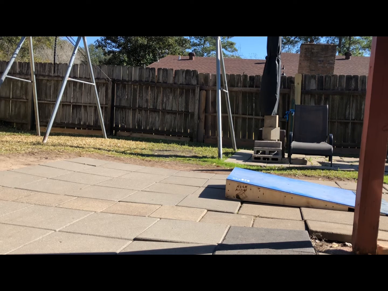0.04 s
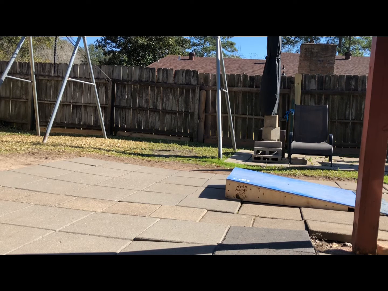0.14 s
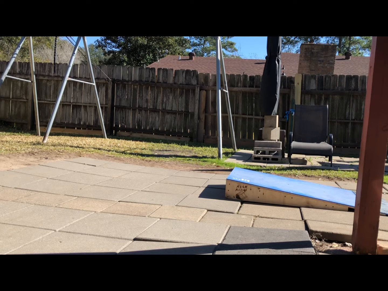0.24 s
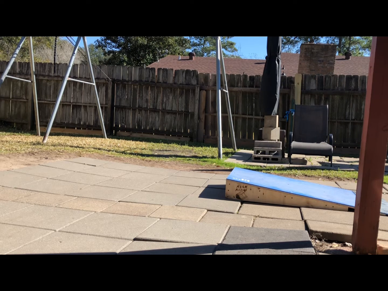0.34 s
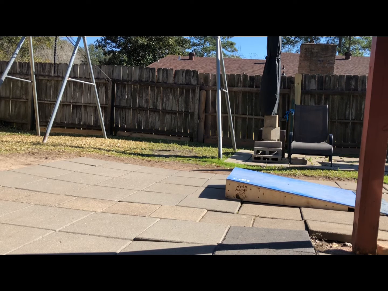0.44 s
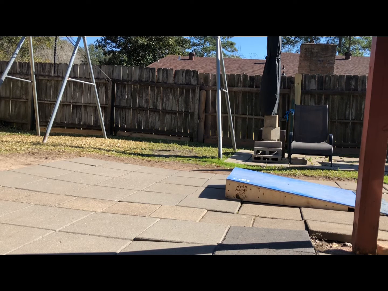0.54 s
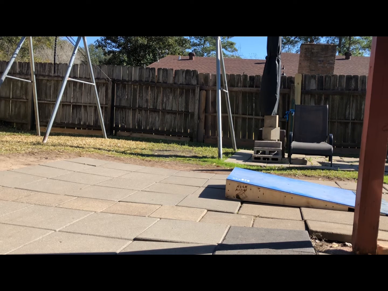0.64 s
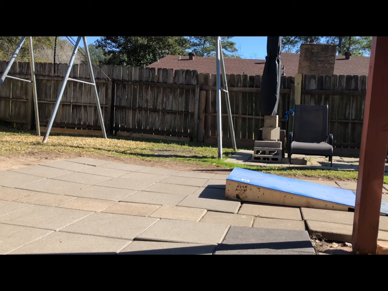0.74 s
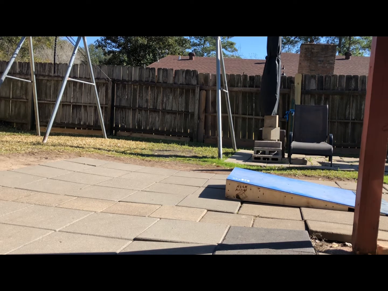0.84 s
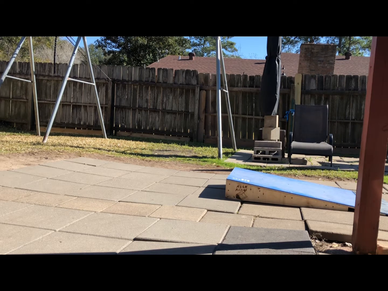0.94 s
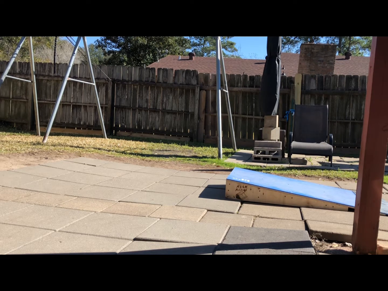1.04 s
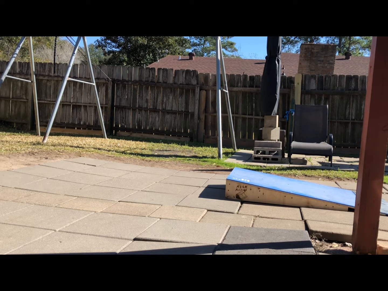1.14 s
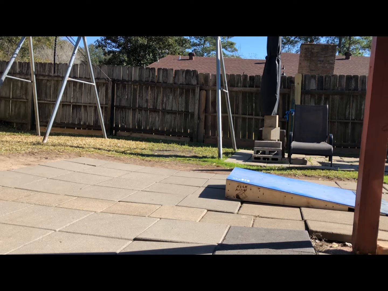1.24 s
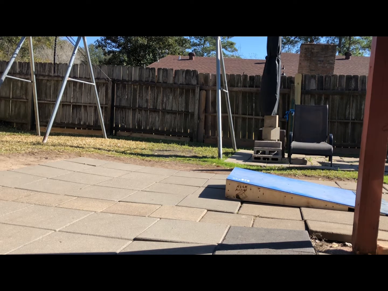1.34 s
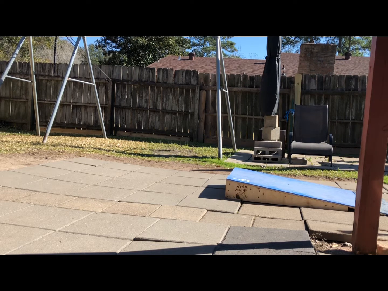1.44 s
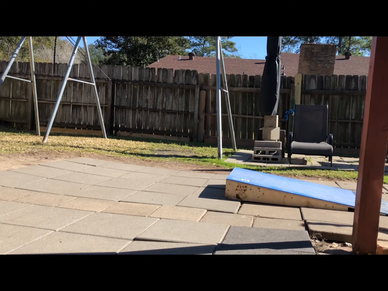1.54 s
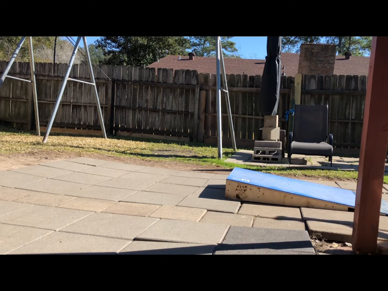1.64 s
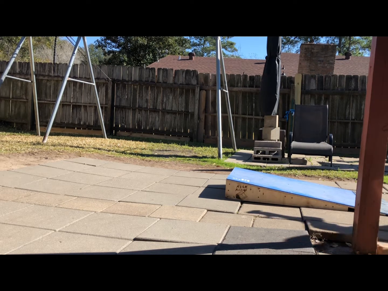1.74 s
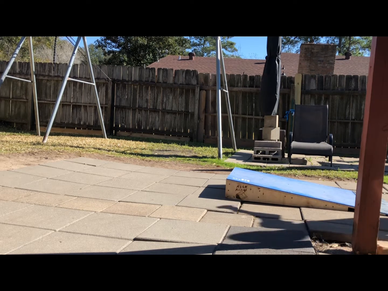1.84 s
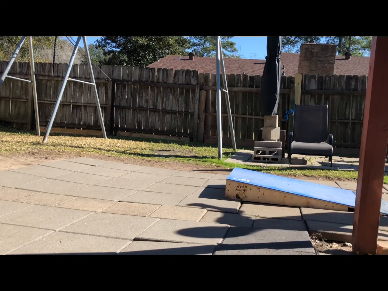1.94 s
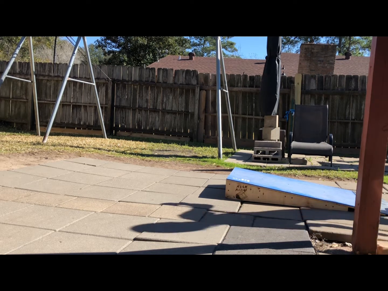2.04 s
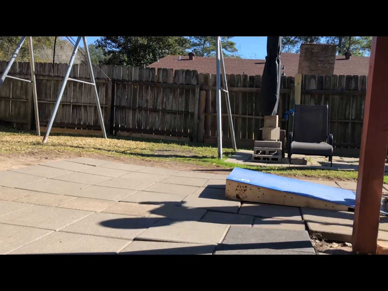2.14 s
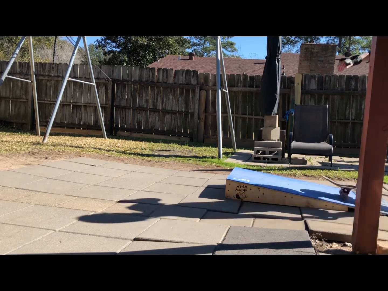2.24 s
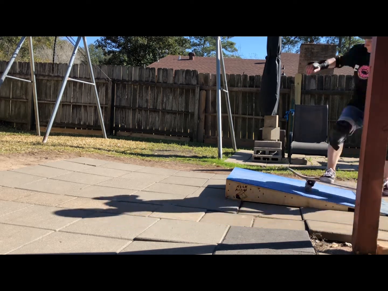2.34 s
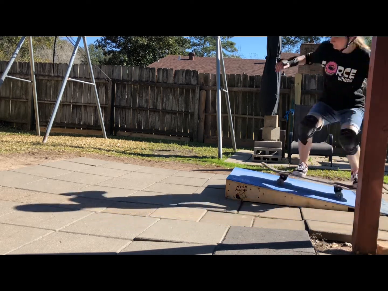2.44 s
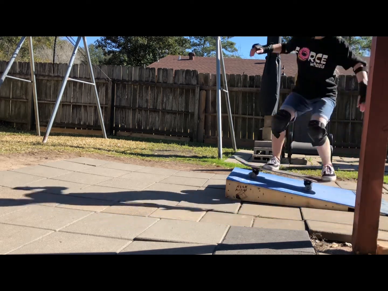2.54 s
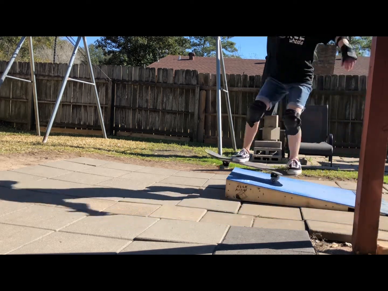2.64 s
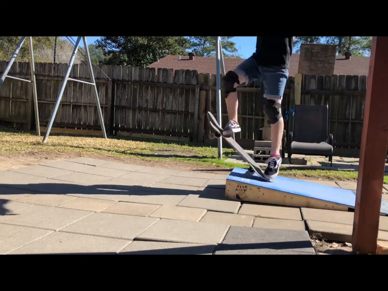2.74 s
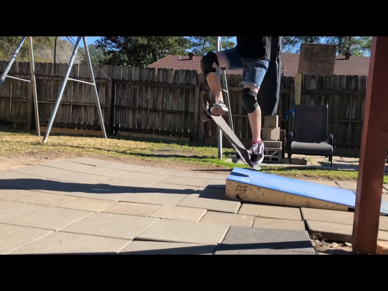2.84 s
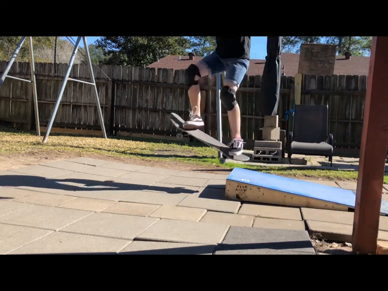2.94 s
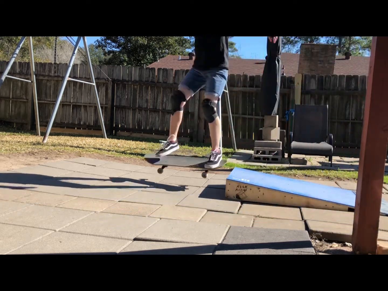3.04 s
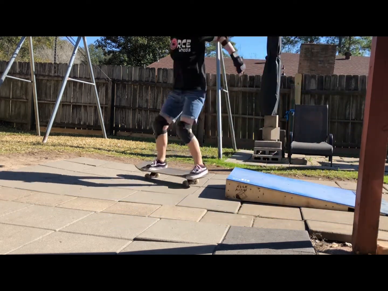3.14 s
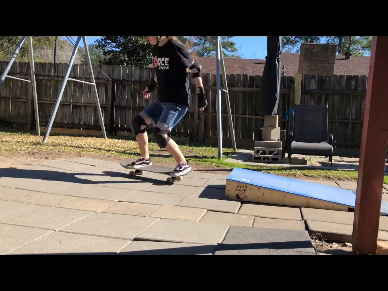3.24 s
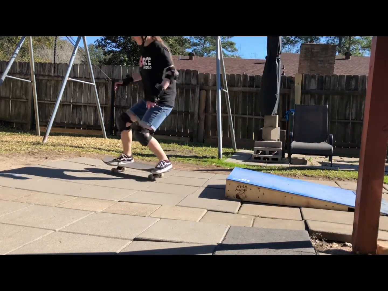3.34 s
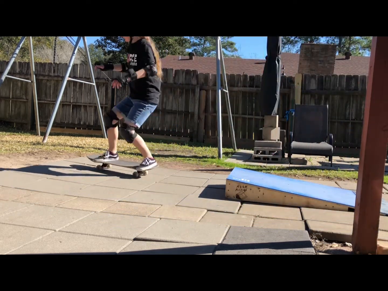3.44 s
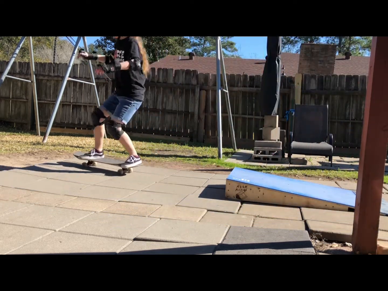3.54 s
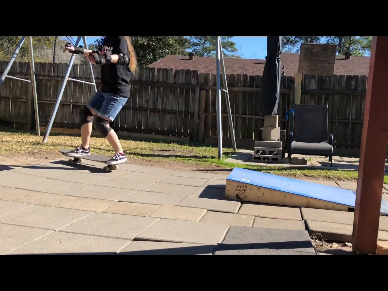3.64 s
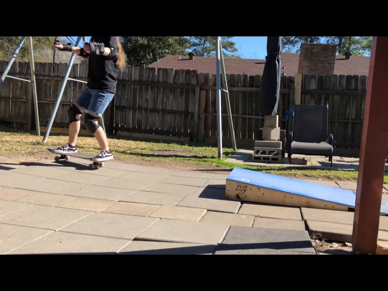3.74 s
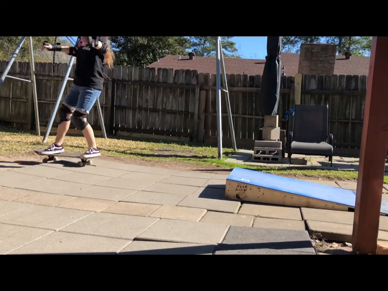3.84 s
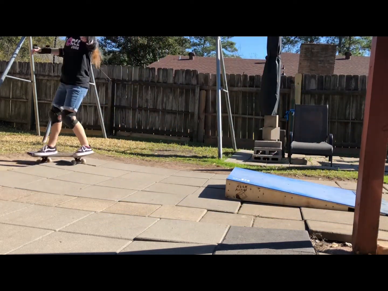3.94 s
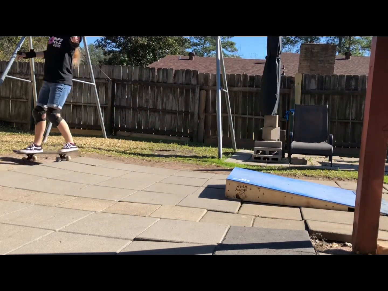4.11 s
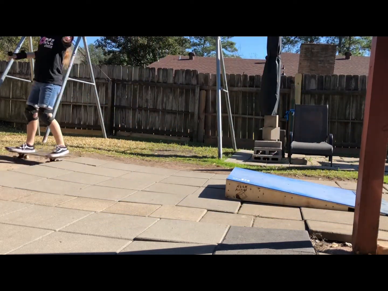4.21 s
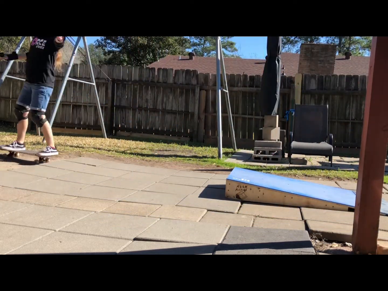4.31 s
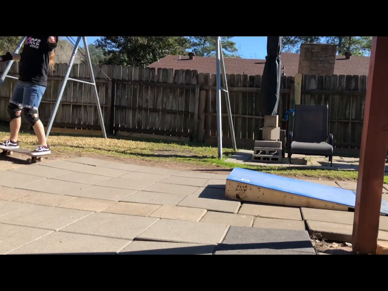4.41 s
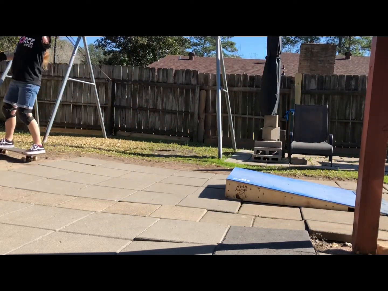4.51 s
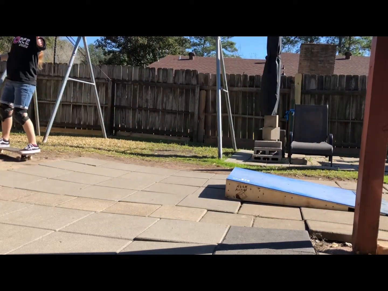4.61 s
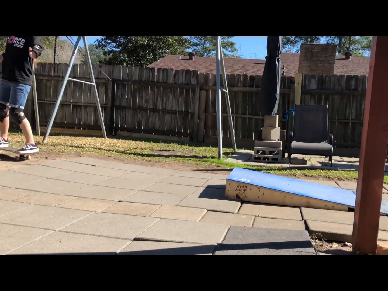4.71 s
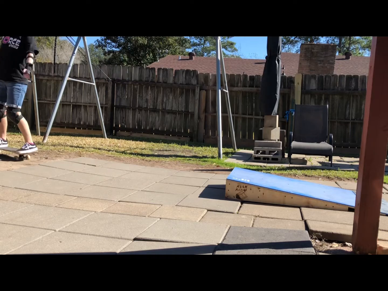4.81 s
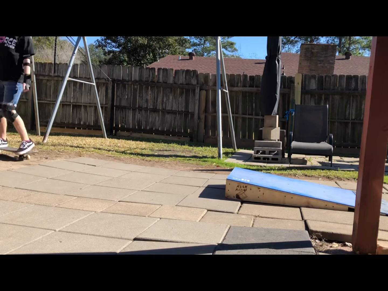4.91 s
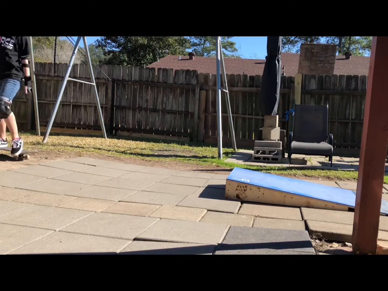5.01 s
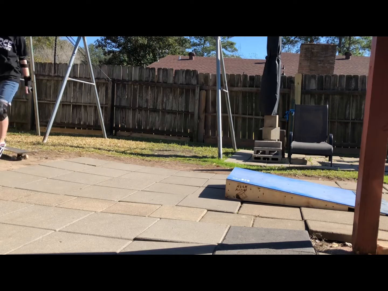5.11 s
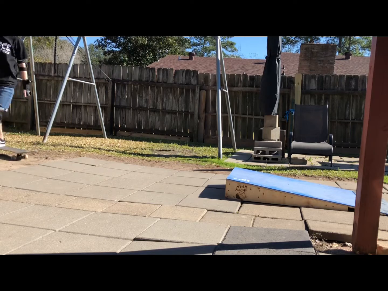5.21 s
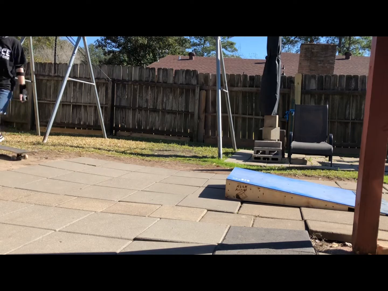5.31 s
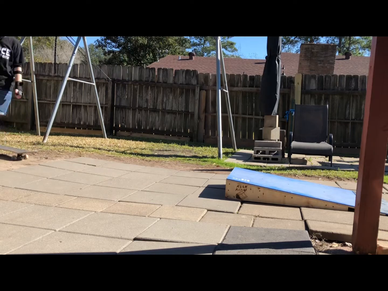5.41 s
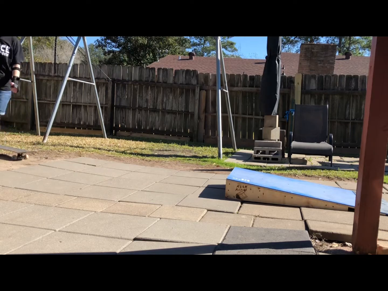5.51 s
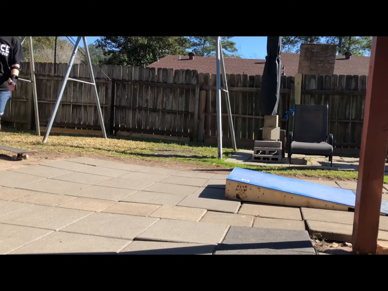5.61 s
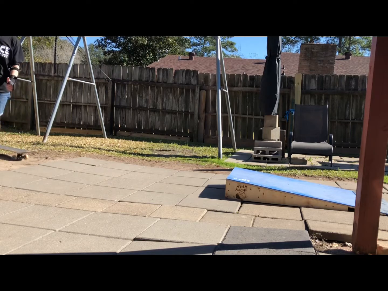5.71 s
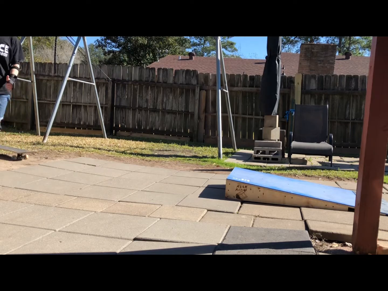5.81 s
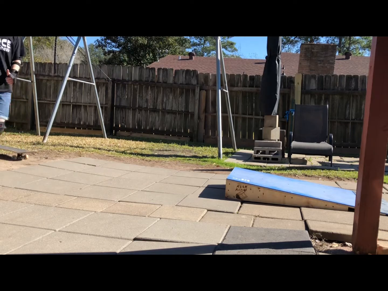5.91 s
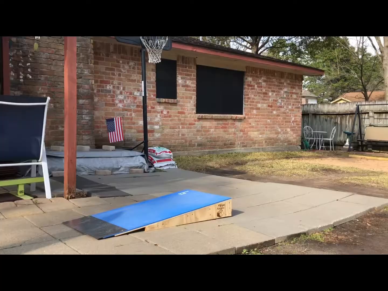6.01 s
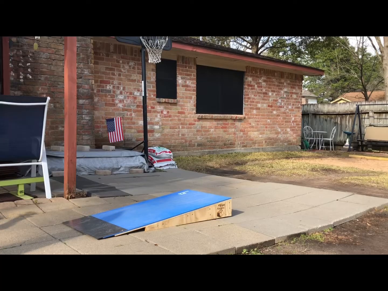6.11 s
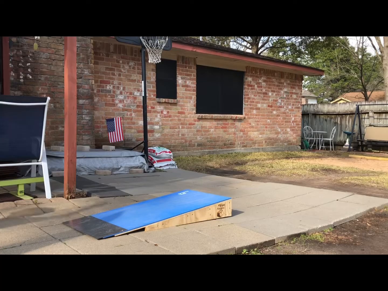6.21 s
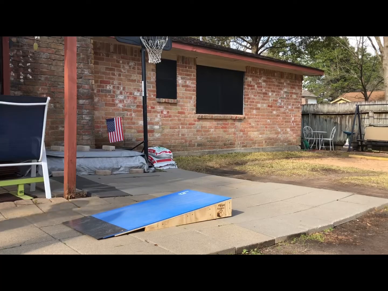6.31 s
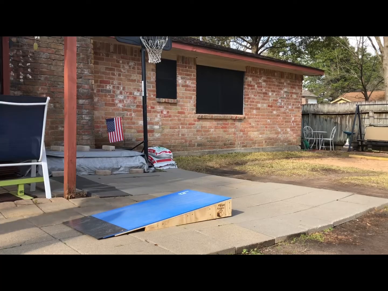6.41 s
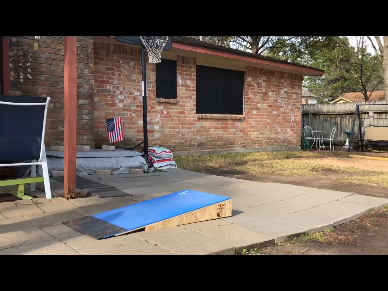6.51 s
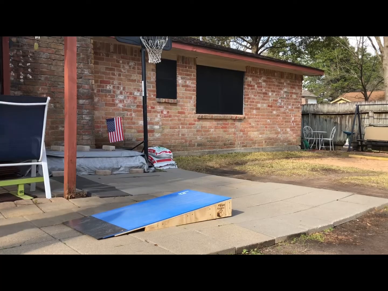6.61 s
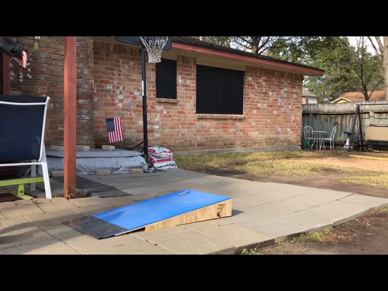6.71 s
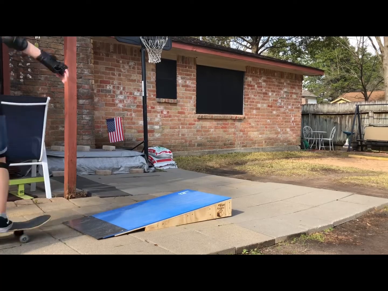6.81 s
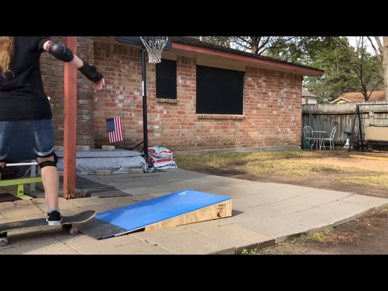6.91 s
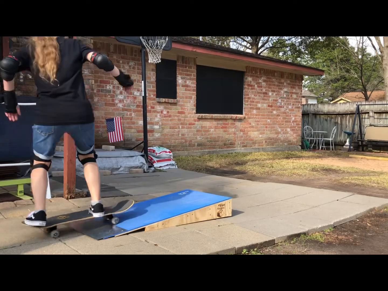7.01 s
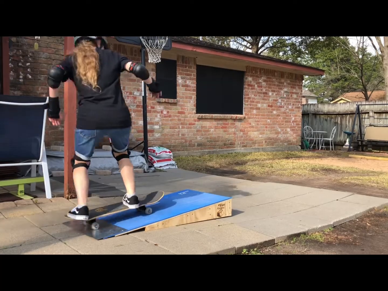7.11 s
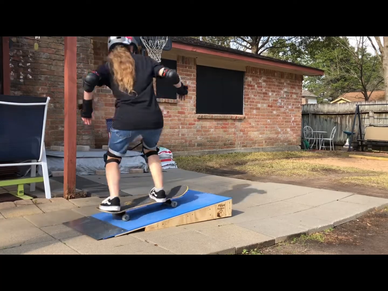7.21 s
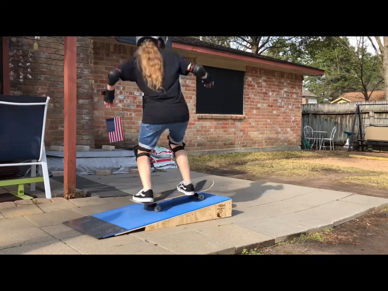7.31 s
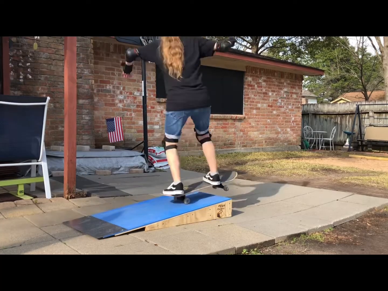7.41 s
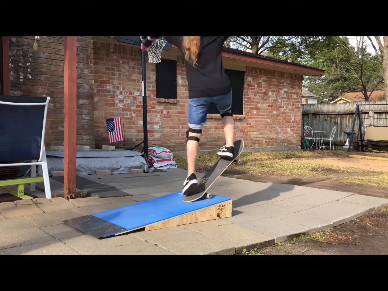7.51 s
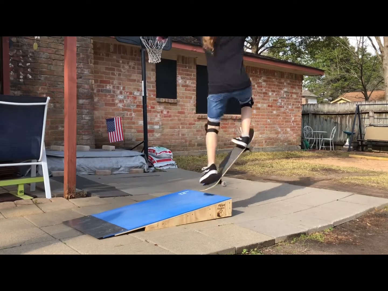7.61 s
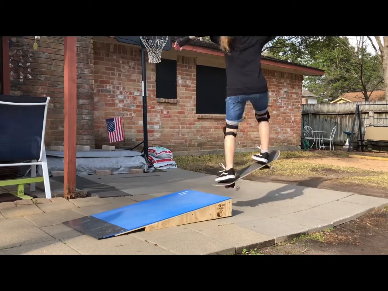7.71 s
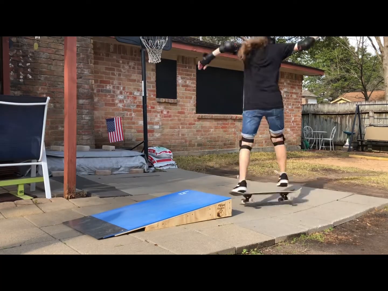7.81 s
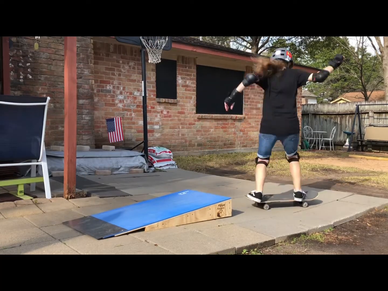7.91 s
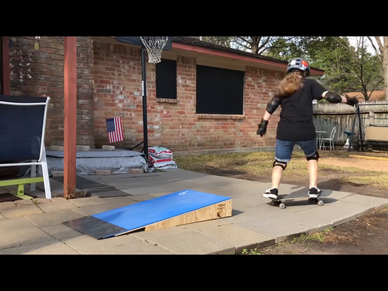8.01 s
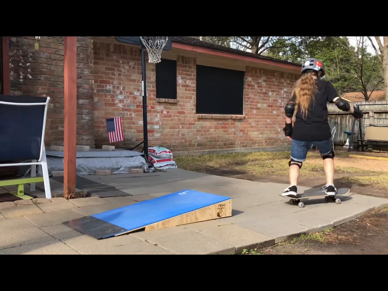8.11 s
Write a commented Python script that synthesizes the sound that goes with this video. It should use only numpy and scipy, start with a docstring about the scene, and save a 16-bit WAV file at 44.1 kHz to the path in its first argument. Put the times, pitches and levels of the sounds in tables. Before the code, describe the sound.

Quiet outdoor low rumble and thin hiss open, with a tiny rubber squeak at 0.25 s and a faint shoe scuff at 0.45. From 0.5 s skateboard wheels roll in, roar and paired knocks over paving joints growing strong by 1.3-2.0. At 2.1-2.4 they rasp onto a hollow plywood ramp, which booms and drums duller. A sharp tail pop cracks at 2.76; the roar drops to bearing hiss, then a cluster of hard landing clacks hits at 3.1. Rolling recedes with sparse knocks and sand ticks; a tail clack at 4.2, then near silence, a small squeak at 5.1 and scuffs at 5.7. At 5.95 a second run begins abruptly, close, with brisk knocks, ramp rasp and deep boom around 7.0, pop at 7.54, landing slaps at 7.85-7.9, and fading roll to 8.15. Short wall and fence echoes; phone sound with thin bass.

```python
"""A low outdoor rumble and a thin background hiss come first, then a rubber squeak and a shoe scuff.
A skateboard then makes two runs across a paved back yard, over a plywood kicker ramp, heard through a phone.
Filtered noise makes the roar; paired knocks and damped modes make the joints, the deck and the hollow ramp.
Noise bursts rasp up the ramp's entry plate; cracks over a ringing deck are the tail pops and landings.
Fence and house wall throw the clacks back as delayed slaps and a decaying noise tail."""
import sys
import numpy as np
from scipy import signal
from scipy.fft import rfft, irfft
from scipy.io import wavfile
from scipy.ndimage import uniform_filter1d

SR = 44100
rng = np.random.default_rng(int(sys.argv[2]) if len(sys.argv) > 2 else 0)


def to_wav(s):
    """Save 16-bit WAV."""
    ch = np.atleast_2d(s).T  # columns
    pcm = np.round(np.clip(ch, -1, 1) * 32767)  # PCM
    wavfile.write(sys.argv[1], SR, pcm.astype(np.int16))


N = 359415
TIME = np.arange(N) / SR  # s from the start
AGE = np.arange(SR // 3) / SR  # s since one hit


def undb(db):
    """Decibels to gain."""
    return 10 ** (np.asarray(db) / 20)


def unit(x):
    """Scale to rms 1."""
    return x / np.sqrt(np.mean(x ** 2))


def unit_hit(x):
    """Scale a hit to the energy of 5 ms at rms 1."""
    return x / np.sqrt(np.sum(x ** 2) / (.005 * SR))


def add(track, s, x):
    """Mix x into the track at time s."""
    i = int(s * SR)
    track[i:i + len(x)] += x[:N - i]


def colour(x, points):
    """Causal minimum-phase filter through (frequency [Hz], gain [dB]) points."""
    hz, db = np.transpose(points)
    size = 4096
    bin_hz = np.arange(size // 2 + 1) * SR / size
    gain_db = np.interp(np.log(bin_hz + 1), np.log(hz), db)
    # folding the cepstrum forward in time gives the minimum phase
    cepstrum = irfft(np.log(undb(gain_db)))
    cepstrum[1:size // 2] *= 2
    cepstrum[size // 2 + 1:] = 0
    impulse = irfft(np.exp(rfft(cepstrum)))
    return signal.fftconvolve(x, impulse)[:len(x)]


def grains(n, spread_db):
    """Dense micro-impacts of uneven size."""
    size_db = spread_db * np.minimum(rng.exponential(size=n), 5)
    return unit(rng.standard_normal(n) * undb(size_db))


def walk(rate):
    """Smooth random wander of rms 1, taking a new target rate times a second."""
    k = int(SR / rate)
    steps = np.repeat(rng.standard_normal(N // k + 1), k)
    return unit(uniform_filter1d(steps, k))[:N]


def narrow(hz, width_hz):
    """A ragged tone: a noise-driven resonance whose centre may move."""
    noise = rng.standard_normal((2, len(hz)))
    lowpass = signal.butter(2, width_hz / 2, fs=SR, output="sos")
    a, b = signal.sosfilt(lowpass, noise)
    phase = 2 * np.pi * np.cumsum(hz) / SR
    return unit(a * np.cos(phase) + b * np.sin(phase))


def rise(start, length):
    """From 0 to 1 in a straight line."""
    return np.clip((TIME - start) / length, 0, 1)


def fade(start, fall_s):
    """Hold at 1, then die away."""
    return np.exp(-np.maximum(TIME - start, 0) / fall_s)


def press(rise_s):
    """Contact force building up."""
    return 1 - np.exp(-(AGE / rise_s) ** 2)


def ring(modes, scatter_db, detune):
    """Decaying modes; every blow meets them in another place and under another load."""
    hz, db, t60 = np.transpose(modes)[:, :, None]
    size, pitch, phase = rng.standard_normal((3, len(modes), 1))
    waves = np.sin(2 * np.pi * (hz * (1 + detune * pitch) * AGE + phase))
    decay = np.exp(-np.log(1000) * AGE / t60)
    return np.sum(undb(db + scatter_db * size) * waves * decay, axis=0)


# distant low rumble outdoors: (frequency [Hz], level [dB])
AIR = [(25, -29.5), (50, -4.5), (90, -1), (125, -3.5), (175, -5.5), (260, -9.5), (400, -20), (600, -24),
       (1400, -31.5), (3000, -39), (4500, -38.5), (7500, -43.5), (10500, -42), (12000, -54.5),
       (16000, -57.5)]
# centre of the thin high background hiss: (time [s], frequency [Hz])
HISS = [(0, 9300), (2.5, 9420), (4.6, 9880), (8.15, 10100)]
AIR_DB = -54  # mean level of the rumble


def background():
    """Distant low rumble of wandering level, under a thin high background hiss of slowly moving pitch."""
    rumble = unit(colour(rng.standard_normal(N), AIR)) * undb(AIR_DB + 1.5 * walk(6.5))
    hiss_hz = np.interp(TIME, *np.transpose(HISS))
    return rumble + undb(-75.5) * narrow(hiss_hz, width_hz=750)


# rubber squeaking as the weight shifts:
# (time [s], level [dB], start frequency [Hz], end frequency [Hz], length [s])
SQUEAKS = [(0.255, -58.5, 1710, 1060, 0.026), (4.64, -63, 2425, 2170, 0.054),
           (5.133, -57, 2587, 1440, 0.026)]


def squeaks():
    """Rubber slips briefly, its pitch falling as the strain lets go."""
    out = np.zeros(N)
    for s, db, start_hz, end_hz, length in SQUEAKS:
        n = int(length * SR)
        tone = narrow(np.geomspace(start_hz, end_hz, n), width_hz=620)
        add(out, s, undb(db) * signal.windows.tukey(n, .5) * tone)
    return out


# single slaps back from fence and walls: (delay [s], level [dB])
WALLS = [(.013, -17), (.029, -17), (.043, -28.5), (.061, -29)]


def yard(x, t60_s, low_t60_s, tail_db, low_db):
    """A few wall slaps and the scatter from fence boards and trees; the lows stay longest."""
    tail_points = [(200, 3.5), (1400, -1.0), (2800, -4.5), (5000, -1.5), (9000, -2.5), (15000, -13.5)]
    low_points = [(100, -1.5), (300, 2.5), (900, -33.5), (3000, -57.5)]
    tail = colour(rng.standard_normal(len(AGE)), tail_points)
    tail = unit(tail * press(0.0043) * np.exp(-np.log(1000) * AGE / t60_s))
    low = colour(rng.standard_normal(len(AGE)), low_points)
    low = unit(low * press(0.035) * np.exp(-np.log(1000) * AGE / low_t60_s))
    echo = undb(tail_db) * tail + undb(low_db) * low
    echo /= np.sqrt(len(AGE))  # levels now hold for the energy of the whole echo
    for delay, db in WALLS:
        echo[int(delay * SR)] += undb(db)
    return signal.fftconvolve(x, echo)[:N]


def rubs(table, spectrum, spread_db, rise_s, fall_s):
    """Bursts of micro-impacts that last as long as the contact, then die away."""
    out = np.zeros(N)
    for s, db, length in table:
        shape = press(rise_s) * np.exp(-np.maximum(AGE - length, 0) / fall_s)
        add(out, s, undb(db) * shape * unit(colour(grains(len(AGE), spread_db), spectrum)))
    return out


# shoes scuffing: (time [s], level [dB], length [s])
SCUFFS = [(.445, -61.5, 0.029), (2.63, -49, 0.072), (4.225, -36, 0.0054), (5.135, -54, 0.011),
          (5.685, -48.5, 0.038), (5.710, -46, .014)]
# colour of a scuff: (frequency [Hz], level [dB])
SHOE = [(200, 3), (800, 1), (2500, -6), (4800, 1.5), (8000, -9.5), (15000, -13)]


def scuffs():
    """Shoe soles scuff, as short bursts of very uneven grains."""
    return rubs(SCUFFS, SHOE, spread_db=5.5, rise_s=0.0013, fall_s=0.011)


# each knock sets the wheels ringing, so that their hum swells and sinks back
KICK_DB, KICK_S = 7.5, 0.036  # hum gain for a kick of 1; decay time


def kicks():
    """Swells towards 1 just after each knock, falling back to 0."""
    return np.max([rise(s, .01) * fade(s, KICK_S) for s, *_ in KNOCKS], axis=0)


# loudness of the rolling, which grows with speed and nearness, one curve a run: (time [s], level [dB])
RUN_A = [(0.52, -47.5), (0.7, -48), (1.12, -42.5), (1.3, -36.5), (2.2, -35), (2.7, -39.5), (3.0, -45),
         (3.5, -44), (4.15, -57), (4.4, -65.5), (5.1, -74.5)]
RUN_B = [(5.96, -41), (6.03, -39), (6.25, -37), (6.8, -38), (7.0, -28), (7.5, -39.5), (8.0, -44),
         (8.15, -49)]
# the jump of each run: (onto the ramp [s], take-off [s], landing [s],
# panel note at the foot [Hz], at the lip [Hz], panel ring-out [s])
JUMP_A = (2, 2.76, 3.09, 160, 190, .04)
JUMP_B = (6.95, 7.53, 7.86, 165, 140, 0.13)
# wheel roar on paving in each run, and on plywood: (frequency [Hz], level [dB])
ROAR_A = [(100, -20), (220, 0), (380, 3), (560, -1), (760, -2.5), (1050, -7), (1700, -8.5), (2600, -28.5),
          (5000, -38.5)]
ROAR_B = [(100, -13), (220, -5), (420, -0.5), (620, -0.5), (760, -3), (950, -5), (2000, -11), (2800, -30),
          (5000, -31)]
ROAR_RAMP = [(100, -17.5), (250, 3), (400, 7.5), (650, 1.5), (1000, -5.5), (2000, -15), (3000, -28.5),
             (6000, -43)]
# colour of bearing hiss and of gritty crunches: (frequency [Hz], level [dB])
GRIT = [(300, -18), (1200, 6), (2500, 1), (4500, -1.5), (7000, -6.5), (10000, -8.5), (12500, -14.5),
        (16000, -10)]
# maple deck with its trucks, bending: (frequency [Hz], level [dB], t60 [s])
DECK_LOW = [(165, -9.5, 0.078), (246.6, -9.5, 0.13), (339, -5, .07), (423.5, -2, 0.06), (510, -1.5, 0.07),
            (589, -4.5, 0.084), (691, 5.5, 0.031), (798, -2, 0.034), (896, -3, 0.044)]
# both axles get onto the ramp; the roar dies after take-off; it returns after landing
AXLE_GAP_S, LIFT_S, SETTLE_S = 0.11, .06, 0.18
# bearing hiss: dB per dB of roar; change on plywood; change off the ground
HISS_SLOPE, SMOOTH_RAMP_DB, FREE_SPIN_DB = 0.44, -2, -0.5
RUMBLE_DB = -10  # deck rumble beside the roar


def rolling(run, jump, spectrum, hum_hz, hum_db, hiss_db, panel_db):
    """Paving shakes deck and wheels; plywood is duller and drums; off the ground the bearings hiss on."""
    s, db = np.transpose(run)
    enter, take_off, land, foot_hz, lip_hz, ring_out = jump
    roar_db = np.interp(TIME, s, db)
    moving = rise(s[0], 0.0021) * (1 - rise(s[-1], 0.14))
    contact = np.maximum(fade(take_off, LIFT_S), rise(land, SETTLE_S))
    on_ramp = rise(enter, AXLE_GAP_S) * (TIME < land)

    bumps = grains(N, spread_db=4.5)
    hum = undb(hum_db + KICK_DB * kicks()) * narrow(hum_hz * undb(.3 * walk(9)), width_hz=65)
    paving = unit(colour(bumps, spectrum)) + hum
    plywood = undb(0.5) * unit(colour(bumps, ROAR_RAMP))
    wheels = ((1 - on_ramp) * paving + on_ramp * plywood) * undb(2.1 * walk(45))

    # the two lowest deck modes, shaken by the same bumps
    deck = ring(DECK_LOW[:2], scatter_db=3.5, detune=0.0092)
    rumble = undb(RUMBLE_DB) * unit(signal.fftconvolve(bumps, deck)[:N])

    note_hz = foot_hz + (lip_hz - foot_hz) * rise(enter, take_off - enter)
    panel = undb(panel_db) * on_ramp * fade(take_off, ring_out) * narrow(note_hz, width_hz=40)

    bearings = unit(colour(grains(N, spread_db=5.0), GRIT)) * undb(1.4 * walk(63))
    bearings_db = hiss_db + HISS_SLOPE * roar_db
    bearings_db += SMOOTH_RAMP_DB * on_ramp * contact + FREE_SPIN_DB * (1 - contact)
    roar = undb(roar_db) * (contact * (wheels + rumble) + panel)
    return moving * (roar + undb(bearings_db) * bearings)


def bounce(hz, rise_s, fall_s, stiffen):
    """A urethane wheel bouncing on its truck; squeezed at first, it starts stiffer and higher."""
    phase = 2 * np.pi * np.cumsum(hz * (1 + stiffen * np.exp(-AGE / rise_s))) / SR
    return unit_hit(np.sin(phase) * press(rise_s) * np.exp(-AGE / fall_s))


# maple deck with its trucks, clacking: (frequency [Hz], level [dB], t60 [s])
DECK_HIGH = [(1030, 4.5, 0.045), (1124, 2.5, 0.038), (1196, 0, 0.066), (1330, 2, 0.026), (1505, 3.5, 0.045),
             (1681, -2.5, 0.023), (1884, -3.5, 0.032), (2095, -3.5, 0.093), (2290, -12.5, 0.02),
             (2581, -16, 0.032), (2850, -20, 0.02), (3215, -14, 0.014), (3450, -11, 0.067)]


def clatter(rise_s, fall_s):
    """The deck's upper modes, shaken by a short run of impacts and strongly damped."""
    modes = ring(DECK_HIGH, scatter_db=1.5, detune=.06) * np.exp(-AGE / .004)
    impacts = grains(len(AGE), spread_db=6) * press(rise_s) * np.exp(-AGE / fall_s)
    return unit_hit(signal.fftconvolve(impacts, modes)[:len(AGE)])


# a grittier knock also has a harder low thud
THUD_DB, THUD_HZ = -13.5, 102  # level beside the grit; pitch it settles to


def single_knock(hz, clack_db, grit_db):
    """One blow: grit crunches, the wheel bounces, a low thud sounds and the deck answers."""
    bend = ring(DECK_LOW, scatter_db=1.5, detune=0.055) * press(0.003) * np.exp(-AGE / 0.03)
    clack = clatter(rise_s=0.0031, fall_s=0.0066)
    crunch = grains(len(AGE), spread_db=3.5) * press(0.00052) * np.exp(-AGE / 0.0099)
    body = undb(-11.5) * bounce(hz, rise_s=0.0026, fall_s=0.0094, stiffen=0.16)
    body += undb(-10.5) * unit_hit(bend)
    body += undb(THUD_DB + grit_db) * bounce(THUD_HZ, rise_s=0.005, fall_s=0.018, stiffen=.1)
    return body + undb(clack_db) * clack + undb(grit_db) * unit_hit(colour(crunch, GRIT))


# paired knocks of wheels or board, on paving joints, on the ramp or at rest: (time [s], level [dB],
# knock frequency [Hz], deck clack [dB], grit [dB], lag of the second knock [s])
KNOCKS = [(0.526, -23, 557, -9, -16, .003), (0.584, -38.5, 524, -1, -10, 0.0026),
          (0.643, -24, 360, -7.5, -18.5, 0.0044), (0.753, -18.5, 354, -22, -36, 0.0028),
          (0.831, -22.5, 700, -18, -24.5, 0.015), (0.953, -14.5, 391, -11, -19, 0.003),
          (1.035, -22.5, 300, -11, -18.5, 0.0033), (1.166, -11, 549, -8.5, -20.5, .003),
          (1.233, -11, 970, -11, -29, 0.0033), (1.317, -5, 588, -15.5, -23.5, 0.0044),
          (1.502, -6.5, 562, -11, -23, 0.0049), (1.644, -1.5, 943, -13, -19, 0.0095),
          (1.809, -3.5, 588, -12.5, -18, 0.014), (1.961, -8, 508, -11.5, -14.5, 0.015),
          (2.106, -4.5, 545, -15, -13, 0.0061), (2.144, -11.5, 688, -24, -39, 0.0038),
          (2.223, -11, 408, -18.5, -16.5, 0.0037), (2.246, -9.5, 694, -11, -15.5, 0.0029),
          (2.282, -12.5, 640, -17, -24, 0.00403), (2.377, -11.5, 493, -20.5, -35, 0.00387),
          (3.31, -20.5, 793, -8.5, -9, 0.0019), (3.34, -25, 327, -15, -21, 0.0041),
          (3.539, -18.5, 610, -12.5, -11, 0.0019), (3.567, -24.5, 384, -12, -19, 0.0041),
          (3.79, -17.5, 382, -18.5, -21, 0.018), (3.901, -28, 660, -15, -13, 0.0031),
          (5.163, -30.5, 472, -24, -28, 0.00203), (5.956, -25, 653, -14.5, -20, 0.0021),
          (6.059, -12, 700, -13.5, -11, 0.015), (6.119, -22.5, 620, -12, -6.5, 0.0028),
          (6.189, -5.5, 695, -12, -12, 0.012), (6.353, -11, 918, -7.5, -12.5, 0.0063),
          (6.498, -6.5, 735, -7.5, -13.5, .006), (6.633, -4, 680, -13, -17, 0.011),
          (6.77, -5.5, 670, -18, -17.5, 0.0091), (6.903, -7.5, 770, -13, -15, 0.0036),
          (6.955, -10, 287, -12, -2, 0.0043), (7.041, -7.5, 389, -18, -12, 0.0051),
          (7.099, -5, 557, -16, -6.5, .011), (7.201, -11, 380, -21, -23.5, .004)]
# the second knock of a pair is lower and cleaner
SECOND_DB, SECOND_PITCH, SECOND_GRIT_DB = 0.5, 0.857, -10


def knocks():
    """Wheels or board knock in pairs, the second blow just after the first."""
    out = np.zeros(N)
    for s, db, hz, clack_db, grit_db, lag in KNOCKS:
        first = single_knock(hz, clack_db, grit_db)
        second = single_knock(hz * SECOND_PITCH, clack_db, grit_db + SECOND_GRIT_DB)
        add(out, s, undb(db) * first)
        add(out, s + lag, undb(db + SECOND_DB) * second)
    return out


# wheels rasping over the entry plate: (time [s], level [dB], length [s])
RASPS = [(2.143, -21, 0.0039), (2.280, -23.5, 0.0083), (6.952, -20.5, 0.013), (7.094, -18.5, 0.0075),
         (7.108, -27, 0.0044)]
# colour of the plate: (frequency [Hz], level [dB])
PLATE = [(300, 0), (1200, 4.5), (2500, -1), (5000, 2.5), (7500, 1), (10000, 1.5), (12500, -6.5),
         (16000, -11)]


def rasps():
    """Wheels rasp over the ramp's entry plate, as sharp bursts of grains."""
    return rubs(RASPS, PLATE, spread_db=-2, rise_s=0.00044, fall_s=0.007)


# booms of the hollow ramp, under the wheels and after the board has left: (time [s], level [dB])
BOOMS = [(2.146, -32), (2.234, -20.5), (2.270, -15), (2.386, -11), (6.970, -6.5), (7.043, -16),
         (7.109, -12), (7.580, -16.5), (7.678, -24.5)]
# plywood ramp: (frequency [Hz], level [dB], t60 [s])
RAMP = [(86.3, -21.5, 0.34), (120.5, -18.5, 0.95), (153.4, 3, 0.11), (198.4, -15, 0.35), (261, -7, 0.12),
        (297, -18.5, 0.043), (364.6, -9, 0.12), (464, -6.5, 0.074)]


def booms():
    """The hollow ramp booms in its own modes, under the wheels and after the board has left."""
    out = np.zeros(N)
    for s, db in BOOMS:
        boom = ring(RAMP, scatter_db=2.0, detune=0.008) * press(0.0078)
        add(out, s, undb(db) * unit_hit(boom))
    return out


# tail pops, landing slaps and the tail set down:
# (time [s], level [dB], knock frequency [Hz], deck clack [dB], hardness [dB])
SLAPS = [(2.762, -6, 660, -11, 4.5), (3.084, -3.5, 650, -9.5, 3), (3.107, -7.5, 974, -16, 4),
         (3.111, 0, 486, -11, 1), (3.124, -7, 346, -13, 1), (3.132, -8, 750, -9, -6),
         (3.146, -7, 944, -10.5, -4.5), (3.156, -9.5, 665, -14.5, 0), (4.231, -13, 518, -7, 0),
         (7.54, -10, 493, -10.5, 7.5), (7.85, -1.5, 647, -16, 3.5), (7.867, -1.5, 1063, -8, 1),
         (7.883, -5, 930, -15, -1.5), (7.907, -7.5, 1097, -19, -9)]
# colour of the crack: (frequency [Hz], level [dB])
CRACK = [(300, -11), (1200, -2.5), (2500, 4.5), (4500, 4.5), (7000, 0), (10000, -4.5), (12500, -8),
         (16000, -11)]
# scatter of a slap from fence and trees: (frequency [Hz], level [dB])
SCATTER = [(120, -2.5), (260, 8), (600, 0.5), (1250, 0.5), (2000, -5.5), (2800, -10), (4800, -14),
           (8000, -22), (15000, -31)]
# parts of a slap beside its knock; hardness adds to the crack and to its scatter round the yard
SLAP_THUD_DB, SLAP_CRACK_DB, SLAP_ECHO_DB = -18, -15.5, -13.5


def slaps():
    """Hard blows of tail and wheels: a crack, the ringing deck, a deep thud, scatter from round the yard."""
    out = np.zeros(N)
    for s, db, hz, clack_db, hard_db in SLAPS:
        bend = unit_hit(ring(DECK_LOW, scatter_db=-2.0, detune=0.045) * press(0.0017))
        clack = ring(DECK_HIGH, scatter_db=5, detune=0.017) * press(0.00053) * np.exp(-AGE / 0.01)
        crack = grains(len(AGE), spread_db=0.5) * press(0.0002) * np.exp(-AGE / 0.0041)
        thud_hz = 215 * undb(rng.standard_normal())
        thud = bounce(thud_hz, rise_s=0.0028, fall_s=.013, stiffen=0.3)
        scatter = colour(grains(len(AGE), spread_db=3.5), SCATTER)
        scatter = unit_hit(scatter * press(0.0047) * np.exp(-AGE / 0.058))
        body = undb(-11.5) * bounce(hz, rise_s=0.0018, fall_s=0.0072, stiffen=0.44) + undb(-11.0) * bend
        deck = body + undb(SLAP_THUD_DB) * thud + undb(clack_db) * unit_hit(clack)
        sharp = undb(SLAP_CRACK_DB) * unit_hit(colour(crack, CRACK)) + undb(SLAP_ECHO_DB) * scatter
        add(out, s, undb(db) * (deck + undb(hard_db) * sharp))
    return out


# grit snapping under a wheel: (time [s], peak level [dB])
TICKS = [(3.24, -24), (3.4932, -32), (3.741, -21), (4.03, -35), (4.1695, -30), (4.465, -44), (6.4723, -26)]
# snap of a grain of sand: (frequency [Hz], level [dB])
SAND = [(300, -4), (3000, -12), (7000, -8), (16000, -6)]


def ticks():
    """Single grains of sand snap under the wheels, as millisecond noise bursts."""
    out = np.zeros(N)
    for s, db in TICKS:
        snap = colour(rng.standard_normal(len(AGE)) * np.exp(-AGE / 0.001), SAND)
        add(out, s, undb(db) * snap / np.abs(snap).max())
    return out


def scene():
    """Both runs, their echoes and the background."""
    board = knocks() + rasps() + booms() + ticks() + scuffs() + squeaks()
    echoes = yard(board, t60_s=0.36, low_t60_s=0.89, tail_db=-14, low_db=-32.5)
    first = rolling(RUN_A, JUMP_A, ROAR_A, hum_hz=511, hum_db=-8.0, hiss_db=-36.5, panel_db=3.5)
    second = rolling(RUN_B, JUMP_B, ROAR_B, hum_hz=629, hum_db=-0.5, hiss_db=-32.5, panel_db=1)
    # slaps carry their own scatter
    return (board + slaps() + echoes + first + second + background())[None]


TOP_HZ = 16000  # upper limit of the phone's microphone


def record(dry):
    """The phone's microphone thins the bass, rounds the loudest peaks and cuts the top."""
    thin = signal.sosfilt(signal.butter(2, 45, "high", fs=SR, output="sos"), dry)
    rounded = np.tanh(thin)
    return signal.sosfilt(signal.ellip(10, .2, 80, TOP_HZ, fs=SR, output="sos"), rounded)


dry = scene()
out = record(dry)
to_wav(out)
```